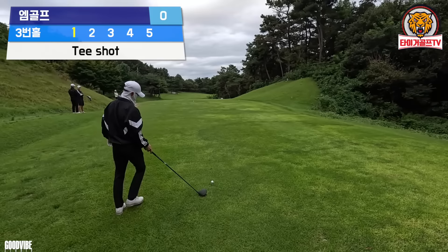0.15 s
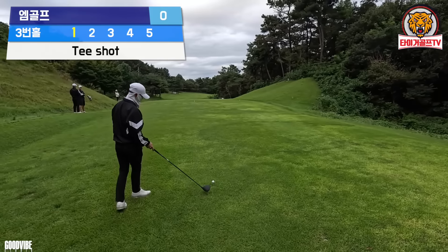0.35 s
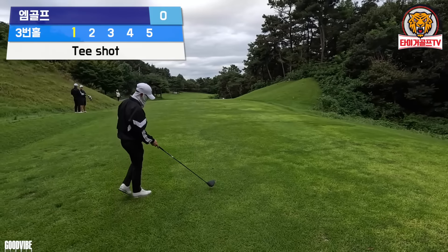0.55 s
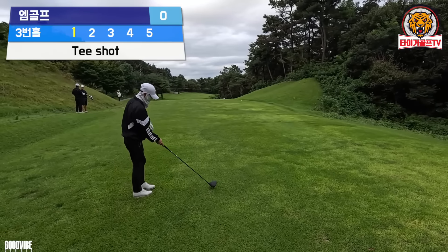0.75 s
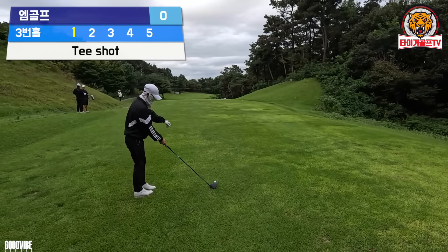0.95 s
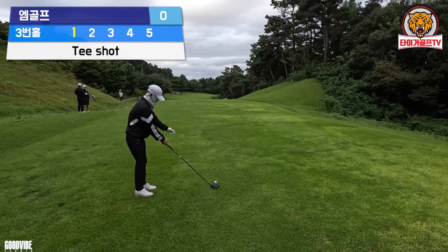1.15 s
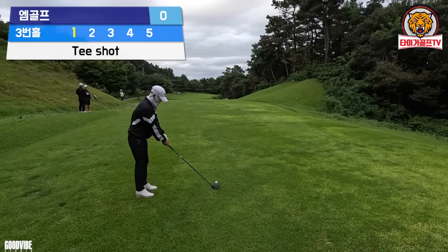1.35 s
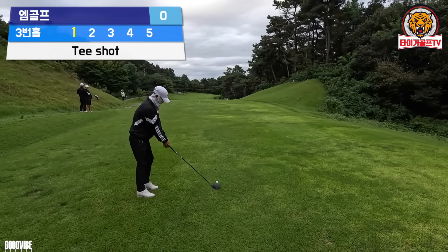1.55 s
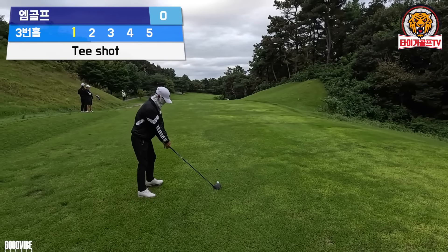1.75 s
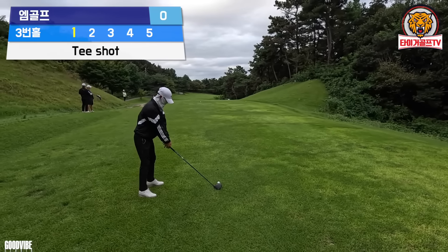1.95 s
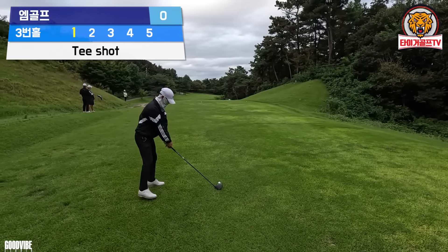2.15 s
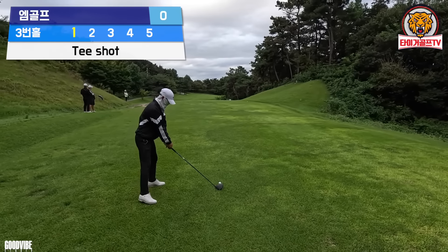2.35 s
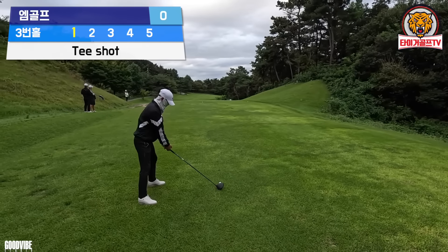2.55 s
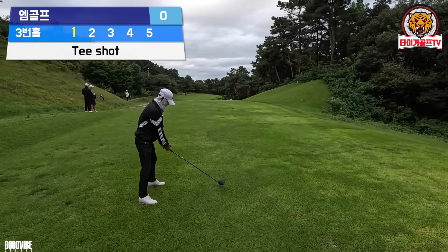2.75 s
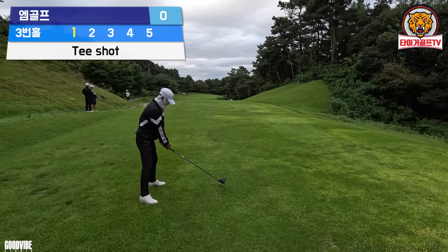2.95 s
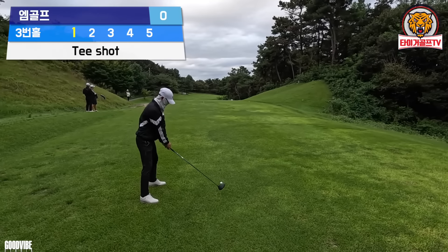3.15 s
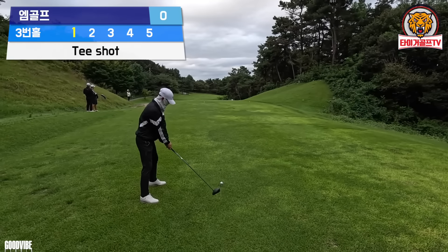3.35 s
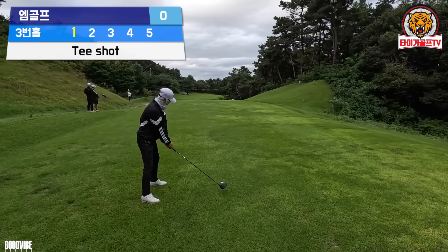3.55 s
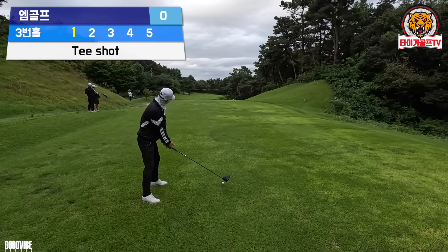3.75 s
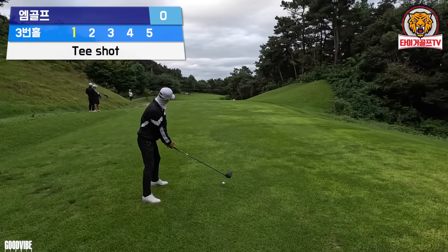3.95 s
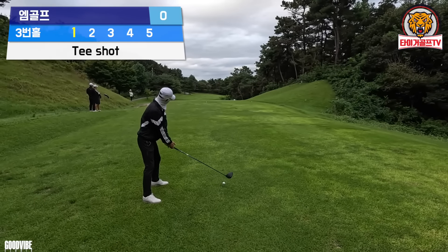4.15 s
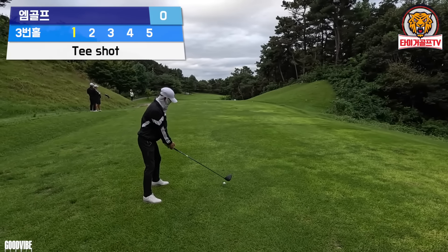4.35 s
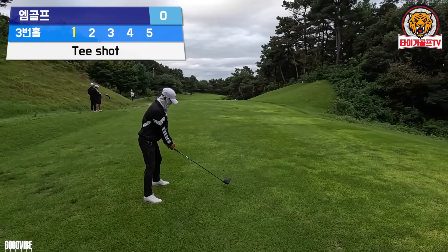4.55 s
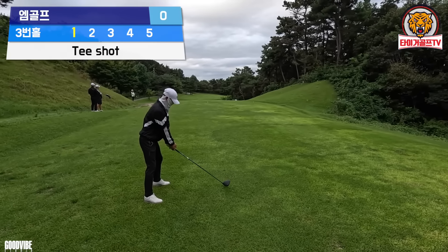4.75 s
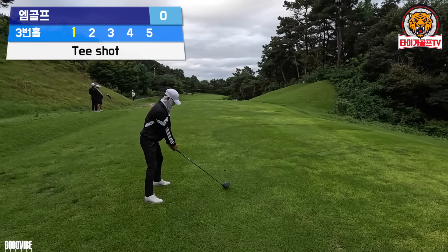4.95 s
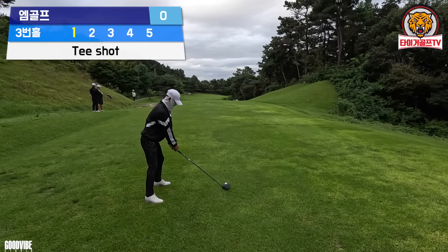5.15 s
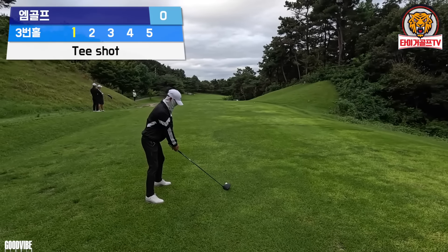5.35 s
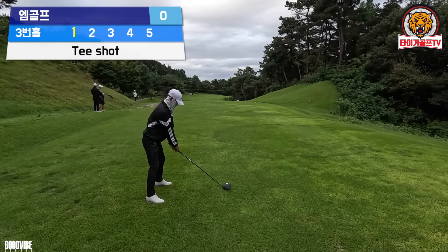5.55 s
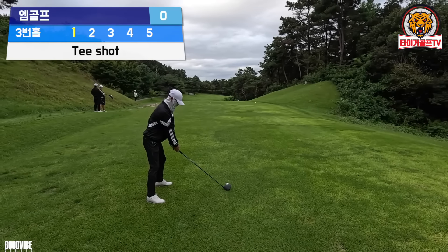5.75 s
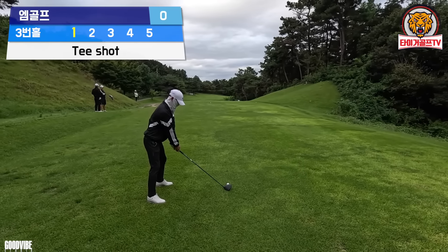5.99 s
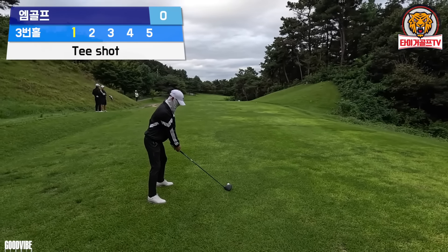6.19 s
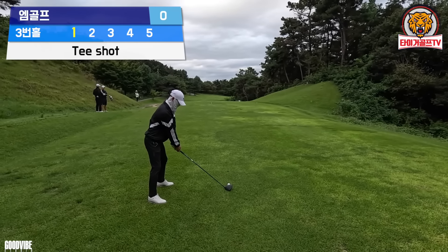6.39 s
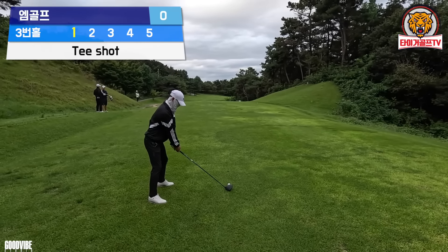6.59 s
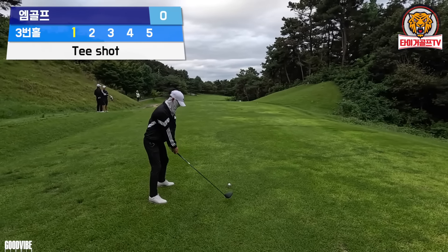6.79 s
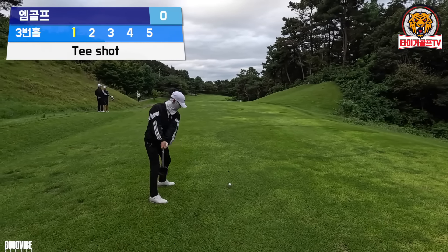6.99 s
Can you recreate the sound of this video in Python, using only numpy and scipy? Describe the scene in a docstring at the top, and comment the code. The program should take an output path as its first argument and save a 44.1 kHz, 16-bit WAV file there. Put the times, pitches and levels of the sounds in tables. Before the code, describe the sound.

Very faint wind and far countryside wash lie under high, steady insect shimmer and pulsing cricket chirps. Small grassy, clothy rustles and soft treads come and go. After a long calm, a rapidly rising whoosh meets a dry, bright metallic crack, extremely loud by comparison, leaning slightly right at its first edge. A diffuse woodland echo and thin airy whistle fade, then a dull bump and scuff.

```python
"""Crickets trill over a low rumble of breeze while a golfer's shoes and sleeves rustle on a grassy tee.
The club then swishes down, its hollow metal head cracks on the ball, the ball whistles away and the trees
throw the crack back; a dull bump and a scuff follow. Wind, leaves and cloth are coloured noise. Crickets and
the ringing club head are sine waves. Swish and ball mix wavering tones with narrow, fuzzy bands of noise."""
import sys
import numpy as np
from scipy import signal
from scipy.fft import rfft, irfft, next_fast_len
from scipy.io import wavfile
from scipy.ndimage import uniform_filter1d

SR = 44100
rng = np.random.default_rng(int(sys.argv[2]) if len(sys.argv) > 2 else 0)


def store_pcm(level_fs):
    """Save levels as 16-bit WAV."""
    pcm = np.round(np.clip(level_fs, -1, 1) * 32767).astype(np.int16)
    wavfile.write(sys.argv[1], SR, np.atleast_2d(pcm).T)


N = 384993
TIME = np.arange(N) / SR  # seconds
IMPACT_S = 7.7241  # the club meets the ball


def gain_of(db):
    """Turns decibels into a factor to multiply by."""
    return 10 ** (np.asarray(db) / 20)


def evened(x):
    """Scales a sound to an rms of 1."""
    return x / np.sqrt(np.mean(x ** 2) + 1e-20)


def read(points, hz):
    """Reads a spectrum in dB, joining its points on a log-frequency axis."""
    point_hz, point_db = np.transpose(points)
    return np.interp(np.log(hz + 1), np.log(point_hz + 1), point_db)


def level_curve(rows):
    """Joins (seconds, dB) rows into a level for every sample."""
    s, db = np.transpose(rows)
    return np.interp(TIME, s, db)


def add(mix, s, sound):
    """Mixes a sound in at time s, cutting off what falls outside."""
    start = round(s * SR)
    sound = sound[max(-start, 0):]
    part = mix[max(start, 0):][:len(sound)]
    part += sound[:len(part)]


def since(s):
    """Seconds since time s, zero before it."""
    return np.maximum(TIME - s, 0)


def swells(rows):
    """A smooth rise and fall for each (start of fall s, level dB, length s) row."""
    t = TIME[::100]  # slow curves need few points
    bumps = sum(gain_of(db) * np.exp(-((t - s) / length) ** 2) for s, db, length in rows)
    return np.interp(TIME, t, bumps)


def rise_and_fade(s, db, rise, t60):
    """An envelope that starts at s, climbs to its level, then falls by 60 dB in t60 seconds."""
    return np.minimum(since(s) / rise, 1) * gain_of(db - 60 * since(s + rise) / t60)


def noise(spectrum):
    """Steady noise of a given colour, rms 1."""
    size = next_fast_len(N)
    hz = np.fft.rfftfreq(size, 1 / SR)
    white = rfft(rng.standard_normal(size))
    return evened(irfft(white * gain_of(read(spectrum, hz)), size)[:N])


def wander(rate):
    """A random curve of straight lines between rate points a second, rms 1."""
    knots = rng.standard_normal(20000)
    return evened(np.interp(TIME * rate, np.arange(len(knots)), knots))


def eddies(hz, width):
    """Noise in a steep resonance that follows the pitch hz: a fuzzy whistle."""
    turn = np.exp(2j * np.pi * np.cumsum(hz * np.ones(N)) / SR)
    r = np.exp(-np.pi * width / SR)
    # shift the pitch down to zero, smooth, and shift back up
    smooth = signal.lfilter([1], [1, -2 * r, r * r], rng.standard_normal(N) / turn)
    return evened((turn * smooth).real)


def whistle(hz, spread, flutter, rate):
    """A vortex tone whose pitch and strength waver."""
    turns = np.cumsum(hz * (1 + spread * wander(rate))) / SR
    return evened(np.sin(2 * np.pi * turns) * (1 + flutter * wander(rate)))


# Colour of the low wind. Each row: frequency in Hz, relative level in dB.
RUMBLE_COLOUR = [(20, -12.5), (40, -13.5), (65, 2), (100, 0.5), (150, -3.5), (250, -9), (400, -17.5),
                 (700, -28), (1500, -65)]
# Strength of the low wind before it wavers. Each row: time in seconds, level in dB.
RUMBLE_STRENGTH = [(0, -63), (3.9, -62.5), (4.45, -58.5), (5.4, -61.5), (6.1, -60), (7.4, -60.5)]
# Colour of the wash of the far countryside. Each row: frequency in Hz, relative level in dB.
WASH_COLOUR = [(100, -0.5), (250, 8), (400, 0.5), (750, 0), (1250, 2.5), (1800, -4), (2600, -13),
               (4000, -15.5), (8000, -49), (14000, -45.5)]
# Strength of that wash before it wavers. Each row: time in seconds, level in dB.
WASH_STRENGTH = [(0, -68.5), (.75, -69.5), (1.3, -65), (2.2, -69), (3.45, -68), (3.85, -71.5), (5.1, -68.5),
                 (5.9, -74.5), (7.2, -69.5)]


def breeze():
    """Lumpy low wind under the soft wash of the countryside, both noise of wavering level."""
    rumble_db = level_curve(RUMBLE_STRENGTH) + 2.0 * wander(17)
    wash_db = level_curve(WASH_STRENGTH) + 1.1 * wander(8)
    return gain_of(rumble_db) * noise(RUMBLE_COLOUR) + gain_of(wash_db) * noise(WASH_COLOUR)


# Colour of the distant insects. Each row: frequency in Hz, relative level in dB.
CHORUS_COLOUR = [(3000, -34.5), (3600, -20.5), (3950, -5), (4400, 2), (4700, -2.5), (5100, -11.5),
                 (5600, -18.5), (6200, -24), (7100, -17), (8000, -26.5), (8700, -48), (9500, -57),
                 (12000, -38), (13500, -58)]


def chorus():
    """Far crickets merge into one shimmering band of noise."""
    chorus_db = -60.5 + 0.99 * wander(110) + 0.17 * wander(12)
    return gain_of(chorus_db) * noise(CHORUS_COLOUR)


CHIRP_EVERY_S = .177  # rough spacing, stretched so that the chirps fit the bout evenly
STROKE_EVERY_S, STROKE_S = .0172, .011
STROKE_SLIDE = .09  # a stroke starts this share above its pitch and ends as far below
# Bouts of chirping from two near crickets, one higher, one lower. Each row: first chirp in seconds,
# last chirp in seconds, level in dB before a common lift and the bushes, middle pitch in Hz.
CHIRP_BOUTS = [(0.024, 0.552, -67.5, 4780), (0.576, 1.272, -65, 4336), (2.023, 2.734, -64.5, 4880),
               (3.014, 3.689, -62.5, 4440), (4.03, 5.096, -65.5, 4890), (5.555, 6.232, -62, 4335),
               (6.328, 7.213, -64.5, 4920), (8.425, 8.589, -67.5, 5000)]


def cricket(count=5):
    """Each chirp is a run of wing strokes sliding down in pitch; the bushes smear it."""
    out = np.zeros(N)
    u = np.linspace(0, 1, round(STROKE_S * SR))  # progress through a stroke
    chirps = []
    for first, last, db, pitch in CHIRP_BOUTS:
        number = round((last - first) / CHIRP_EVERY_S) + 1
        chirps += [(s, db, pitch) for s in np.linspace(first, last, number)]
    chances = rng.standard_normal((len(chirps), count, 3))
    for (s, db, pitch), chance in zip(chirps, chances):
        for k, (late, sharp, loud) in enumerate(chance):
            place = k - (count - 1) / 2  # zero at the middle stroke
            hz = pitch * (1 + STROKE_SLIDE * (1 - 2 * u)) * (1 + 0.011 * sharp)
            stroke = np.sin(np.pi * u) * np.sin(2 * np.pi * np.cumsum(hz) / SR)
            start = s - STROKE_S / 2 + STROKE_EVERY_S * place + .0005 * late
            uneven_db = 1.2 * loud - 1.1 * place ** 2  # outer strokes are softer
            add(out, start, gain_of(db + 7.5 + uneven_db) * stroke)
    t = np.arange(SR // 10) / SR
    bushes = rng.standard_normal(len(t)) * gain_of(-60 * t / 0.035)
    smeared = signal.oaconvolve(out, bushes / np.linalg.norm(bushes))[:N]
    return out + gain_of(-4) * smeared


# Shoes on grass and jacket sleeves. Each row: loudest moment in seconds, level in dB before the grain,
# length in seconds from there until it has fallen to about a third.
RUSTLE_SWELLS = [(.03, -66, 0.042), (0.138, -63.5, 0.05), (.34, -62.5, .06), (.47, -69, 0.049),
                 (.56, -68, 0.029), (.84, -74, .04), (1.14, -68, 0.13), (2.19, -76, 0.061),
                 (2.49, -72.5, 0.09), (3.17, -70.5, 0.094), (6.997, -75, 0.14), (7.24, -69.5, 0.21),
                 (7.635, -61.5, 0.062)]
# Colour of grass and cloth. Each row: frequency in Hz, relative level in dB.
GRASS_COLOUR = [(150, 3), (500, -17), (1400, 12), (2500, 6.5), (4500, 5), (7000, -6), (9500, -28),
                (12000, -11), (14000, -43)]
# The golfer shifts weight on the turf. Each row: loudest moment in seconds, level in dB, length in seconds.
TREAD_SWELLS = [(.36, -71, 0.092), (1.12, -68.5, 0.15), (2.73, -69, 0.11), (3.13, -67.5, 0.099),
                (3.3, -69, 0.38), (5.15, -71, 0.41)]
# A dull bump, then a scuff, after the drive: loudest moment in seconds, level in dB, length in seconds.
BUMP, SCUFF = (8.711, -44.5, 0.0047), (8.723, -52, 0.0086)


def golfer():
    """Grainy swells of grass and cloth, soft treads, and a bump and scuff after the swing, all noise."""
    rustle = swells(RUSTLE_SWELLS) * gain_of(1.9 * wander(260)) * noise(GRASS_COLOUR)
    tread = swells(TREAD_SWELLS) * eddies(440, width=560)
    bump = swells([BUMP]) * eddies(380, width=500)
    scuff = swells([SCUFF]) * eddies(1100, width=1900)
    return rustle + tread + bump + scuff


# the club is fastest just before contact; it gathers speed slowly and loses it quickly
FASTEST_S, GATHER_S, SPENT_S = 7.708, .082, .029
# base level of the eddies and of the rush of air at full speed, and how far each lies lower at rest (dB)
SHAFT_DB, SHAFT_RANGE_DB, RUSH_DB, RUSH_RANGE_DB = -25.3, 54, -39, 33
# guiding pitch of the eddies at rest and at full speed; throb rate, and its depth at full speed
SLOW_HZ, FAST_HZ, THROB_HZ, THROB_DB = 590, 840, 45, 4
# eddies left behind by the follow-through: they swell, fade and sink in pitch
WAKE_DB, WAKE_RISE_S, WAKE_T60_S, WAKE_HZ, WAKE_SINK_S = -50.5, 0.073, 0.51, 225, 0.39
# Colour of the air rushing round the club. Each row: frequency in Hz, relative level in dB.
RUSH_COLOUR = [(30, -8.5), (130, -5), (280, 7.5), (500, -4.5), (1500, -1), (2500, -5.5), (4500, -10.5),
               (7000, -22.5), (9000, -45), (12000, -37.5), (16000, -57)]


def swish():
    """The shaft sheds eddies at a pitch set by its speed; the thick head sheds slower ones, leaving a wake."""
    t = TIME - FASTEST_S
    speed = np.exp(-(t / np.where(t < 0, GATHER_S, SPENT_S)) ** 2)  # 1 at the fastest
    moving = np.minimum(speed / .05, 1)  # silences the club at rest
    hz = SLOW_HZ + (FAST_HZ - SLOW_HZ) * speed ** 3
    db = SHAFT_DB - SHAFT_RANGE_DB * (1 - speed)
    throb_db = THROB_DB * np.sqrt(speed) * np.cos(2 * np.pi * THROB_HZ * t)
    shaft = gain_of(-2.6) * whistle(hz, spread=.06, flutter=.15, rate=300)
    shaft += gain_of(-7) * eddies(hz * .83, width=220)
    overtone = gain_of(-21) * eddies(hz * 2.05, width=300)
    head = gain_of(-29.5 + 0.6 * db) * eddies(hz * .37, width=80)
    rush = gain_of(RUSH_DB - RUSH_RANGE_DB * (1 - speed)) * noise(RUSH_COLOUR)
    wake_hz = WAKE_HZ * np.exp(-since(IMPACT_S) / WAKE_SINK_S)
    wake_level = rise_and_fade(IMPACT_S, WAKE_DB, WAKE_RISE_S, WAKE_T60_S)
    wake = wake_level * eddies(wake_hz, width=260)
    return (gain_of(db + throb_db) * (shaft + overtone) + head + rush) * moving + wake


# the whistle glides up to a steady pitch, holds its base level, then fades
LAUNCH_HZ, CRUISE_HZ, GLIDE_S = 1750, 2020, .115
FLIGHT_DB, FLIGHT_HOLD_S, FLIGHT_FADE_DB_PER_S = -56, 0.27, 95


def ball():
    """The spinning, dimpled ball whistles in three rising tones that blur as it climbs away."""
    db = FLIGHT_DB - FLIGHT_FADE_DB_PER_S * since(IMPACT_S + FLIGHT_HOLD_S)
    hz = CRUISE_HZ + (LAUNCH_HZ - CRUISE_HZ) * np.exp(-since(IMPACT_S) / GLIDE_S)
    away = np.clip((TIME - IMPACT_S) / .25, .15, 1)
    clear = whistle(hz, spread=.012, flutter=.35, rate=150)
    blurred = eddies(hz, width=190)
    low = np.sqrt(1 - away) * clear + np.sqrt(away) * blurred
    upper = gain_of(-2.5) * eddies(hz * 1.615, width=110) + gain_of(3.5) * eddies(hz * 1.85, width=170)
    return gain_of(db) * (low + gain_of(-9 * away) * upper) * (TIME > IMPACT_S)


# Returns of the crack from the tee, the turf and the tree line. Each row: delay in seconds,
# level in dB before it wavers, rise in seconds, seconds to fall by 60 dB.
CRACK_RETURNS = [(0, -39.5, .001, .05), (0, -50.5, .012, 1.1), (0.091, -41.5, .075, 1.02)]
# Colour of the crack as the trees return it. Each row: frequency in Hz, relative level in dB.
TREES_COLOUR = [(88, -39), (150, -11.5), (175, -26), (246, -12.5), (320, -13), (698, -5), (1980, -6.5),
                (2310, -9.5), (4000, -3.5), (5960, -6.5), (9220, -31.5), (12000, -27.5), (14000, -50)]


def echo():
    """Countless blades, leaves and trunks scatter the crack into a swelling wash that dulls as it dies."""
    power = sum(rise_and_fade(IMPACT_S + delay, db, rise, t60) ** 2 for delay, db, rise, t60 in CRACK_RETURNS)
    bright = noise(TREES_COLOUR)
    dull = signal.sosfiltfilt(signal.butter(1, 5500, fs=SR, output="sos"), bright)
    far = np.clip((TIME - 7.92) / 0.17, 0, 1)  # the air takes the treble from the longer paths
    return np.sqrt(power) * gain_of(1.3 * wander(120)) * (bright + far * (dull - bright))


# Colour of the first snap of contact. Each row: frequency in Hz, relative level in dB.
SNAP_COLOUR = [(100, -15), (700, -4.5), (1700, -4.5), (3300, 1.5), (5000, -10), (7000, -26.5),
               (8500, -12.5), (12000, -21), (16000, -50.5)]


def snap(size=2048):
    """The click of the face meeting the ball: all its energy comes as early as its colour allows, peak 1."""
    log_gain = read(SNAP_COLOUR, abs(np.fft.fftfreq(size, 1 / SR))) * np.log(10) / 20
    click = np.fft.ifft(np.exp(np.conj(signal.hilbert(log_gain)))).real
    return click / abs(click).max()


# Ring of the hollow club head. Each row: pitch in Hz, starting level in dB, seconds to fall by 60 dB.
HEAD_RING = [(2370, -31, 0.03), (2960, -17.5, 0.03), (3209, -23.5, 0.005), (3280, -11, 0.016),
             (3710, -19, 0.031), (3760, -25.5, 0.024), (4530, -30, 0.042), (4550, -20, 0.028),
             (4840, -26.5, 0.028), (5360, -23, 0.038), (5800, -22, 0.024), (5925, -27.5, 0.022),
             (6210, -27, 0.031), (7160, -37, 0.027), (7600, -38.5, 0.013), (11765, -43, 0.02)]
# The low knock of ball and face springing apart. Each row: pitch in Hz, level in dB at the crest,
# time to the crest in seconds.
FACE_KNOCK = [(237.5, -15.5, 0.0028), (720, -10.5, 0.0011), (1420, -17, 0.0013)]


def crack():
    """Contact snaps, ball and face knock for a cycle or two, and the shell rings on."""
    t, out = np.arange(SR // 4) / SR, np.zeros(N)
    for k, (hz, db, t60) in enumerate(HEAD_RING):
        ring = gain_of(db - 60 * t / t60) * np.sin(2 * np.pi * hz * t)
        add(out, IMPACT_S, (-1) ** k * ring)  # every other one is flipped
    for k, (hz, db, crest) in enumerate(FACE_KNOCK):
        u = t / crest
        swell = u * np.exp((1 - u * u) / 2)  # reaches 1 at the crest
        add(out, IMPACT_S, (-1) ** k * gain_of(db) * swell * np.sin(2 * np.pi * hz * t))
    add(out, IMPACT_S, gain_of(3.0) * snap())
    return out


def from_right(x):
    """The bite of the first wavefront leans to the right; its bass and the ring after it are centred."""
    first = np.exp(-(since(IMPACT_S) / .002) ** 2) * x
    bite = signal.sosfilt(signal.butter(4, (2700, 4300), "bandpass", fs=SR, output="sos"), first)
    edge = signal.sosfilt(signal.butter(4, 9000, "highpass", fs=SR, output="sos"), first)
    side = gain_of(-8.5) * bite + gain_of(-14.5) * edge
    return np.array([x - side, x + side])


def scene():
    """Everything sits in the middle but the front of the crack."""
    centre = breeze() + chorus() + cricket() + golfer() + swish() + ball() + echo()
    return centre + from_right(crack())


def record(dry):
    """The crack overloads the microphone and pulls the gain down, which recovers slowly; then the band limit."""
    ceiling = .7
    held = dry / (1 + (dry / ceiling) ** 4) ** (1 / 4)  # rounds off the peaks
    power_db = 10 * np.log10(abs(uniform_filter1d((held ** 2).mean(0), size=200)) + 1e-12)
    recovery_db = 2.5 * TIME  # 2.5 dB a second
    held_peak_db = np.maximum.accumulate(power_db + recovery_db) - recovery_db
    over_db = np.maximum(held_peak_db + 21.5, 0)  # above a threshold of -21.5 dB
    r = np.exp(-1 / (.06 * SR))  # the gain falls with a short lag
    cut_db = .55 * signal.lfilter([1 - r], [1, -r], over_db)
    ducked = held * gain_of(-cut_db)
    soft = signal.sosfilt(signal.butter(8, 13900, fs=SR, output="sos"), ducked)
    band_limit = signal.firwin(255, 16400, window=("kaiser", 9), fs=SR)
    return signal.oaconvolve(soft, band_limit[None], "same")


dry = scene()
out = record(dry)
store_pcm(out)
```